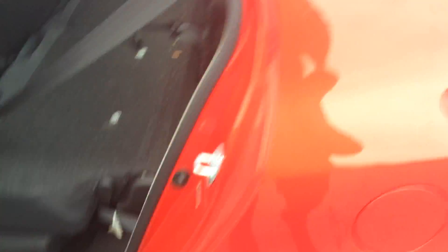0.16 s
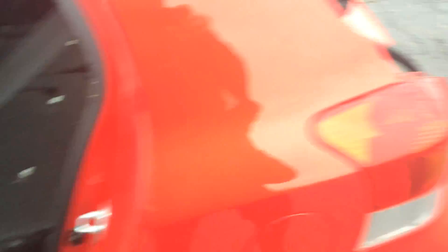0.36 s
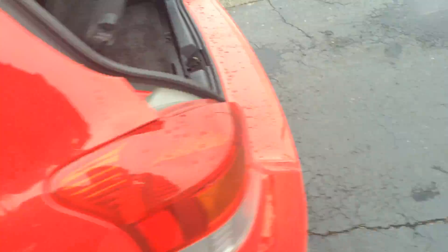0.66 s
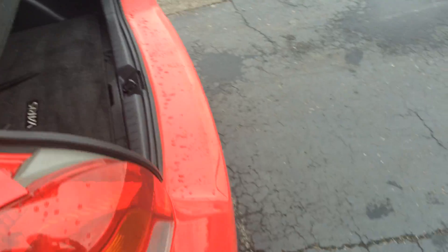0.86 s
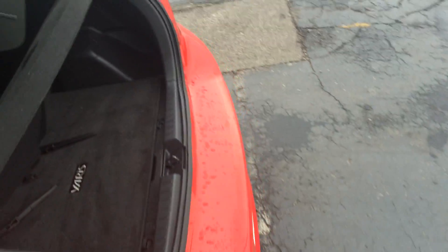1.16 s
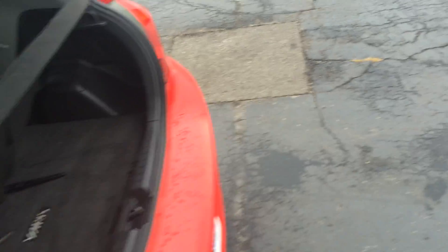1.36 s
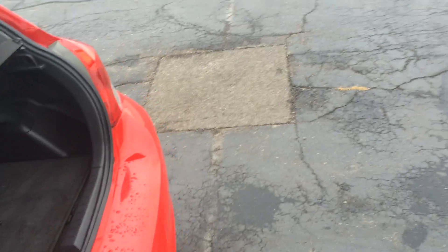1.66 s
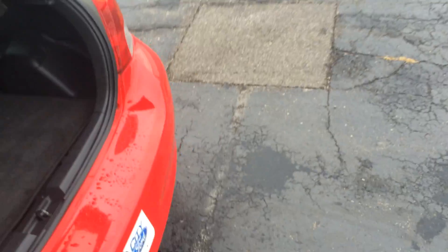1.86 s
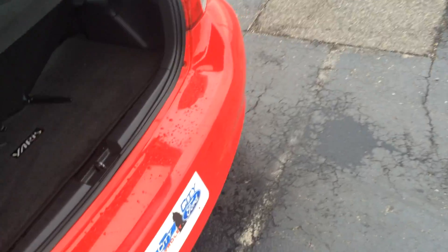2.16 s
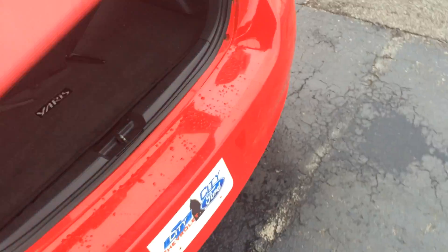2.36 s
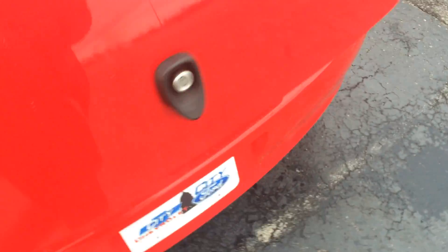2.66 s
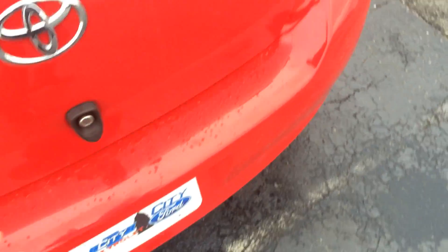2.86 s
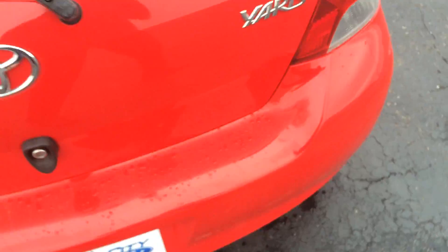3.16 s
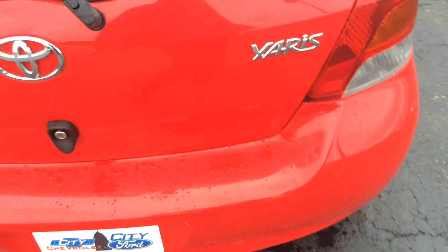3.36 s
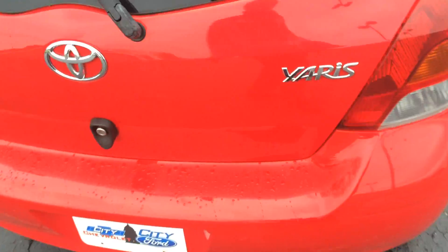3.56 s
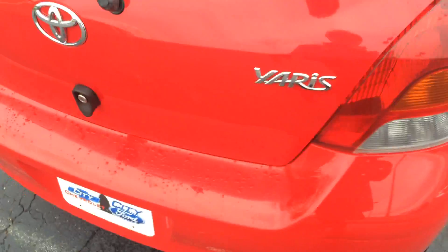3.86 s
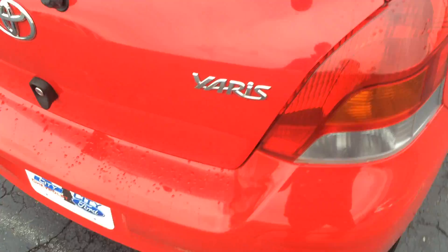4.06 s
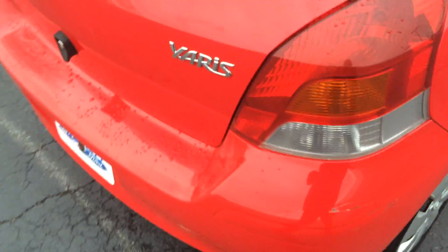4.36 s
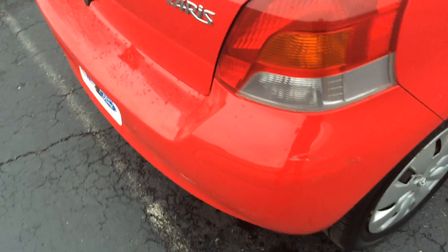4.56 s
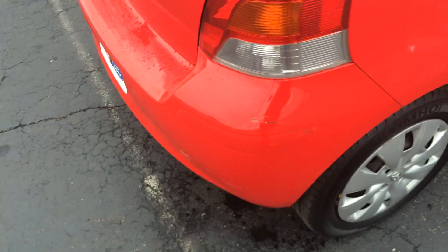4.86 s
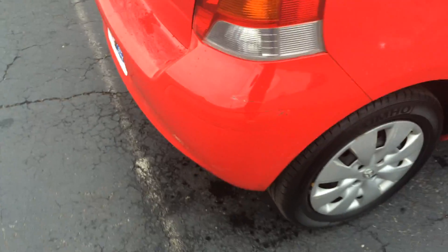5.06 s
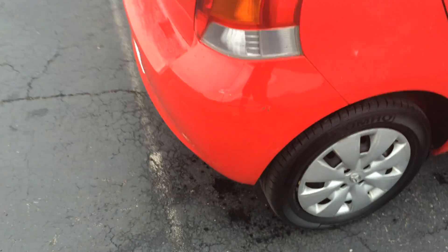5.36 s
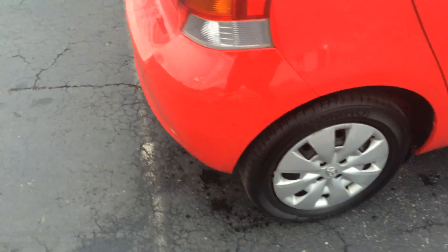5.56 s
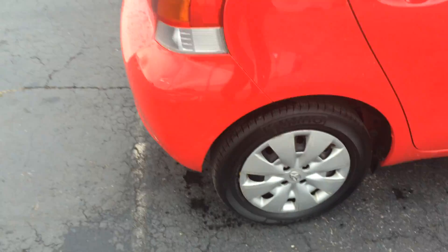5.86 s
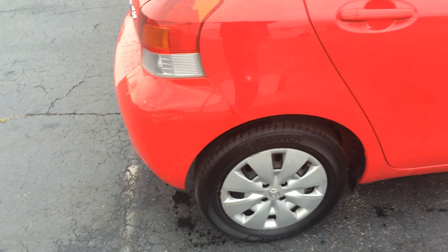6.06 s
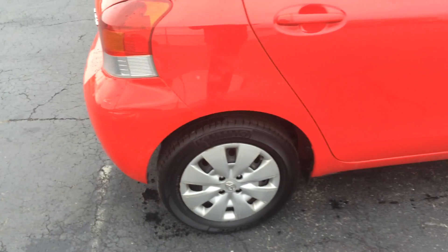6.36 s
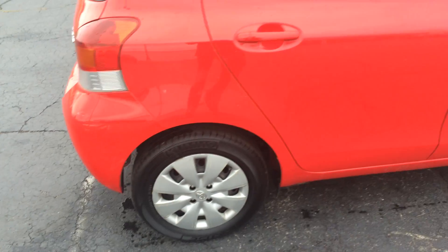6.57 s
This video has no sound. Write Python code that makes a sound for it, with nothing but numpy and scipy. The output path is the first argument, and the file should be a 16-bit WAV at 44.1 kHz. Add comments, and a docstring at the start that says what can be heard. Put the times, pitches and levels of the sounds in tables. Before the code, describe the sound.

A walk around a small hatchback in open air. Early wind buffeting leads straight into a door slam, tight and booming with a metallic latch. Quiet handling knocks, hollow panel rings and a couple of sharp clicks follow. The tailgate then drops shut with deep thumps and rattle. The background dips briefly after the loud peaks. Later, blustery bursts hit the microphone and a nearby engine ticks at idle as the car stops screening it.

```python
"""Two slams beside a small hatchback in a breezy car park: a rear door pushed shut, then the tailgate.
Each meets its rubber seal, the latch clacks, panels boom as decaying modes and trim rattles as noise bursts.
Wind eddies thump on the handheld microphone as smooth pressure swings over a rumbling breeze.
An idling engine ticks, clearer once the microphone rounds the car, over far traffic and open-air hiss.
The recorder's gain control ducks after loud peaks."""
import sys
import numpy as np
from scipy import signal
from scipy.fft import rfft, irfft
from scipy.io import wavfile
from scipy.ndimage import uniform_filter1d, minimum_filter1d

SR = 44100
rng = np.random.default_rng(int(sys.argv[2]) if len(sys.argv) > 2 else 0)


def int16_out(signal):
    """Quantize to a 16-bit WAV file."""
    q = np.round(np.clip(np.atleast_2d(signal).T, -1, 1) * 32767)
    wavfile.write(sys.argv[1], SR, q.astype(np.int16))


N = 296793
TIME = np.arange(N) / SR
RING = TIME[:SR // 2]  # half a second for each struck sound
LAG = RING - RING.mean()  # the same span, centred on zero


def undb(db):
    """Decibels to gain."""
    return 10 ** (np.asarray(db) / 20)


def curve(rows):
    """Levels of a (start_s, level_db) table, joined by straight lines in time."""
    rows = np.array(rows)
    return np.interp(TIME, rows[:, 0], rows[:, 1])


def add(out, s, sound):
    """Mix a sound in at time s, trimmed to the ends of the scene."""
    start = int(round(s * SR))
    sound, start = sound[max(-start, 0):], max(start, 0)
    out[start:start + len(sound)] += sound[:N - start]


def colour(x, points):
    """Filter by a (pitch_hz, level_db) spectrum, falling 20 dB per octave beyond its ends; rms 1."""
    hz, db = np.transpose(points)
    octave = np.log2(np.arange(len(x) // 2 + 1) * SR / len(x) + 1)
    known = np.log2(hz)
    beyond = np.abs(octave - np.clip(octave, known[0], known[-1]))
    gain = undb(np.interp(octave, known, db) - 20 * beyond)
    y = irfft(rfft(x) * gain, len(x))
    return y / np.std(y)


def noise(points, size=N):
    """Coloured noise of rms 1."""
    return colour(rng.standard_normal(size), points)


def walk(rate):
    """Slow chance: random levels held 1 / rate s and slewed; spread a little under 1."""
    hold = int(SR / rate)
    steps = np.repeat(rng.standard_normal(N // hold + 1), hold)
    return uniform_filter1d(steps, hold)[:N]


def fade(t60, attack_s):
    """Quick rise and exponential decay."""
    return (1 - np.exp(-RING / attack_s)) * np.exp(-np.log(1000) * RING / t60)


def ring(modes, attack_s, stretch=1):
    """Struck modes (pitch_hz, level_db, t60), each dying at its own rate."""
    total = 0
    for hz, db, t60 in modes:
        total = total + undb(db) * np.sin(2 * np.pi * hz * RING) * fade(t60 * stretch, attack_s)
    return total / np.sqrt(sum(undb(db) ** 2 for _, db, _ in modes))


def swing(hz, smoothness):
    """One swell and recoil of air pressure, centred on lag 0, of any polarity."""
    shape = (1 - 2j * np.pi * hz * LAG / (smoothness - .5)) ** -smoothness
    return np.real(shape * np.exp(2j * np.pi * rng.random()))


# gusts of the breeze: peak_s, spread_s (Gaussian), relative level_db
GUSTS = [(0.166, 0.16, -37.5), (0.566, 0.23, -29.5), (1.194, 0.19, -40.5), (1.672, 0.11, -42),
         (2.946, 0.23, -39.5), (3.73, 0.95, -40.5), (4.453, 0.055, -25.5), (4.764, 0.05, -32),
         (5.283, 0.094, -31), (5.677, 0.095, -37.5), (5.977, 0.26, -40), (6.473, 0.029, -32)]
CALM_DB = -49  # the breeze between gusts, on the same scale


def breeze_gain():
    """Strength of the breeze: gusts swell and die away over a steady calm, adding as powers."""
    power = undb(CALM_DB) ** 2
    for s, spread_s, db in GUSTS:
        gust = undb(db) * np.exp(-.5 * ((TIME - s) / spread_s) ** 2)
        power = power + gust ** 2
    return np.sqrt(power)


# strongest eddies on the microphone: centre_s, relative level_db, pitch_hz, relative core_level_db
EDDIES = [(.015, -25, 165, -36.5), (0.089, -19.5, 75, -58), (0.162, -16, 118, -44), (.371, -20, 151, -39),
          (.401, -11.5, 152, -34), (0.458, -20, 98, -52), (.477, -13.5, 119, -29.5),
          (0.492, -10.5, 113, -35), (0.526, -8.5, 99, -38), (.551, -22.5, 238, -29.5),
          (.582, -14, 154, -27), (.653, -8, 139, -35), (0.692, -19.5, 190, -29.5), (.756, -19, 160, -42),
          (1.115, -19.5, 124, -44), (1.424, -19.5, 117, -54), (2.309, -20.5, 78, -61),
          (4.421, -16.5, 110, -37), (4.443, -8, 107, -41), (4.473, -15, 160, -28), (4.499, -15.5, 220, -21),
          (4.591, -19.5, 199, -33), (4.628, -12.5, 106, -38.5), (4.687, -14.5, 153.7, -29.5),
          (4.738, -22.5, 130, -34), (4.767, -10.5, 160, -17.5), (4.785, -11.5, 133, -27),
          (4.795, -10, 98, -43.5), (4.807, -18, 340, -19.5), (4.829, -15.5, 149, -26.5),
          (4.845, -13, 150, -38), (4.884, -16.5, 115, -42), (5.142, -13.5, 138, -26.5),
          (5.171, -13.5, 110, -45), (5.19, -12, 124, -32), (5.216, -11, 121, -34),
          (5.292, -13.5, 125, -29.5), (5.309, -13, 134, -36), (5.343, -18, 146, -36),
          (5.406, -26.5, 202, -35.5), (5.567, -14.5, 88, -47), (5.586, -19.5, 190, -30),
          (5.677, -18.5, 143, -44), (5.71, -19.5, 90, -64), (5.905, -18.5, 124, -42),
          (6.012, -11.5, 84, -54), (6.08, -24.5, 131, -64), (6.177, -18.5, 119, -55),
          (6.406, -19.5, 196, -30), (6.478, -21, 257, -29.5), (6.49, -19, 154, -28.5)]
# colour of the breeze's rumble: pitch_hz, level_db
BREEZE_COLOUR = [(20, -21), (40, -1.5), (75, 5), (130, 1.5), (200, -7), (300, -16), (600, -32), (1500, -61)]


def wind(smoothness=5.46, eddy_db=-1.0, core_hz=340, core_rise=0.52, core_smoothness=8, core_db=0.5,
         swirl_db=-10, swirl_s=0.0085, wake_db=-18, wake_s=0.014, breeze_db=-1, calm_db=2, gusty_db=4):
    """Eddies are smooth pressure swings with sharp cores, in fine swirl and a wider, duller wake."""
    eddies, swirling, trailing = np.zeros(N), np.zeros(N), np.zeros(N)
    for s, db, hz, sharp_db in EDDIES:
        start_s = s + LAG[0]
        body = undb(db + eddy_db) * swing(hz, smoothness)
        # small eddies have higher cores
        core = undb(sharp_db + core_db) * swing(core_hz + core_rise * hz, core_smoothness)
        add(eddies, start_s, body + core)
        add(swirling, start_s, undb(sharp_db) ** 2 * np.exp(-(LAG / swirl_s) ** 2))
        add(trailing, start_s, undb(db) ** 2 * np.exp(-(LAG / wake_s) ** 2))
    swirl_colour = [(150, -27), (350, 4.5), (500, -3.0), (750, -23), (1500, -30.5)]
    wake_colour = [(30, -6.0), (70, 4.0), (130, 1.5), (250, -14.5), (600, -28.5), (1200, -74)]
    swirl = np.sqrt(swirling) * noise(swirl_colour)
    wake = np.sqrt(trailing) * noise(wake_colour)
    # the breeze is rough around the eddies and rumbles more evenly in the lulls
    unrest = np.sqrt(np.abs(uniform_filter1d(trailing, SR // 3)))
    gustiness_db = calm_db + (gusty_db - calm_db) * np.tanh(unrest / unrest.mean())
    breeze = noise(BREEZE_COLOUR) * breeze_gain() * undb(gustiness_db * walk(38))
    return eddies + undb(swirl_db) * swirl + undb(wake_db) * wake + undb(breeze_db) * breeze


# weak eddies: rate, level above the breeze strength, usual pitch
STRAY_PER_S, STRAY_DB, STRAY_HZ = 15, 8, 125
STRAY_SPREAD_DB, STRAY_OCTAVES = 2, 0.56  # scatter of level and of pitch


def stray_eddies(strength):
    """Weak eddies at random moments, following the breeze that carries them: s, level_db, pitch_hz."""
    moments = rng.random(size=300)[:int(STRAY_PER_S * N / SR)]
    scatter = np.clip(rng.standard_normal((300, 2)), -2, 2)
    rows = []
    for u, (loud, small) in zip(moments, scatter):
        breeze_db = 20 * np.log10(strength[int(u * N)])
        db = breeze_db + STRAY_DB + STRAY_SPREAD_DB * loud
        rows.append((u * N / SR, db, STRAY_HZ * 2 ** (STRAY_OCTAVES * small)))
    return rows


def flutter(smoothness=5):
    """The weak eddies patter softly on the microphone as small pressure swings."""
    out = np.zeros(N)
    for s, db, hz in stray_eddies(breeze_gain()):
        add(out, s + LAG[0], undb(db) * swing(hz, smoothness))
    return out


# colours of the far traffic and of the open-air hiss: pitch_hz, level_db
TRAFFIC = [(15, -47), (25, -14), (75, 0.5), (161, -12.5), (197, -2), (236, -22.5), (381, -18), (466, -23.5),
           (642, -24), (753, -20.5), (1060, -24), (1490, -30.5), (3000, -38), (3900, -84), (6600, -120)]
HISS = [(1500, 3), (2100, 2), (2500, -0.5), (3500, -1), (4600, -1.5), (6000, -5), (9000, -10.5),
        (15000, -16.5)]
# hiss by the door, behind the car and along its far side, one list each: start_s, relative level_db
HISS_LEVEL = [
    [(0.0, -61.5), (0.276, -62.5), (0.472, -56.5), (0.74, -61)],
    [(1.2, -60.5), (1.308, -59), (1.658, -64), (2.9, -60.5)],
    [(3.4, -58.5), (3.55, -58), (4.37, -59), (6.73, -60)],
]


def car_park(traffic_db=-45.0, hiss_db=1.5):
    """Nearly steady far traffic, and a smooth hiss that changes as the microphone goes round the car."""
    traffic = noise(TRAFFIC) * undb(traffic_db + 0.62 * walk(8.9))
    hiss = noise(HISS) * undb(curve(np.vstack(HISS_LEVEL)) + hiss_db)
    return traffic + hiss


# colour of the engine's ticking: pitch_hz, level_db
TICK = [(700, -14), (1400, 0), (1800, -8), (2450, -18), (2850, -8.5), (3150, -1), (3600, -3), (4100, -8.5),
        (7000, -16.5), (12000, -20)]
IDLE_HZ = 13.6  # turns of the crankshaft per second
# the car body screens the engine until the microphone rounds the corner
ENGINE_DB, SCREEN_DB, CORNER_S, CORNER_TAKES_S = -56.5, -10.5, 4.99, 0.063
ENGINE_RISE_DB_PER_S = 1.5  # the microphone then walks towards the engine


def engine(tick_decay=0.19, steady=0.72, uneven_db=1):
    """Metallic ticking noise swells on every crankshaft turn, louder once the car no longer screens it."""
    turn = np.cumsum(IDLE_HZ * (1 + 0.0065 * walk(2.28))) / SR % 1
    # rise and decay are fractions of a turn
    beat = steady + np.exp(-turn / tick_decay) * (1 - np.exp(-turn / 0.026))
    beat = beat / np.sqrt(np.mean(beat ** 2))
    past_corner_s = TIME - CORNER_S
    screened = .5 - .5 * np.tanh(past_corner_s / CORNER_TAKES_S)
    approach_db = ENGINE_RISE_DB_PER_S * np.maximum(past_corner_s, 0)
    level_db = ENGINE_DB + SCREEN_DB * screened + approach_db
    return noise(TICK) * beat * undb(level_db + uneven_db * walk(27))


# colour of loose trim: pitch_hz, level_db
RATTLE = [(300, -20), (700, 10.5), (2200, 2.5), (3200, -2), (5000, -6.5), (7000, -14.5), (11000, -18),
          (15000, -25)]


def slam(contacts, panel, steel, steel_db, clack_colour, clack_t60, tail_db, tail_t60, rattle_t60, push_s,
         ragged_db=0.5, ragged_per_s=260):
    """Each contact booms the panels, clacks the steel latch and shakes loose, unevenly chattering trim."""
    out, loose = np.zeros(N), np.zeros(N)
    boom, clang = ring(panel, push_s), ring(steel, 0.0006)
    # the shell around the latch rings on more softly, alike after every contact
    shell = undb(tail_db) * noise(clack_colour, size=len(RING)) * fade(tail_t60, 0.0064)
    for s, boom_db, clack_db, hard_hz, rattle_db in contacts:
        # the latch itself stops fast
        latch = noise(clack_colour, size=len(RING)) * fade(clack_t60, 0.00052)
        clack = latch + shell + undb(steel_db) * clang
        # contacts cushioned by rubber lose their treble
        cushion = signal.butter(2, hard_hz, fs=SR, output="sos")
        clack = signal.sosfilt(cushion, clack)
        add(out, s, undb(boom_db) * boom + undb(clack_db) * clack)
        rattle = noise(RATTLE, size=len(RING)) * fade(rattle_t60, 0.00027)
        add(loose, s, undb(rattle_db) * rattle)
    chatter = undb(ragged_db * np.clip(walk(ragged_per_s), -2, 2))
    return out + loose * chatter / np.sqrt(np.mean(chatter ** 2))


# contacts of the closing door, levels relative:
# start_s, boom_level_db, clack_level_db, hardness_hz (treble cutoff), rattle_level_db
DOOR = [(.771, -30, -27, 606, -75), (.785, -33, -16, 5000, -44), (.802, -16, -21, 6000, -26.5),
        (.805, -8, -13, 6000, -33.5), (.815, -41, -24, 6000, -42), (.825, -31, -17, 1500, -26),
        (.831, -3.5, -31, 600, -33), (.852, -11.5, -30, 1500, -41), (.918, -25, -39, 600, -53)]
# door panel and cabin modes, then steel around its latch: pitch_hz, relative level_db, t60_s
DOOR_MODES = [(79, -1, 0.13), (158.3, 0.5, 0.26), (168, -1, 0.29), (209, -1, 0.26), (281, 5.5, 0.085),
              (317, 4.5, 0.065), (346, -1, 0.059), (391.5, -8.5, 0.183), (469, -8, 0.13)]
DOOR_STEEL = [(682, 0, 0.15), (770, 11, 0.072), (819, 15, 0.086), (910, 3, 0.058), (1094, -7, 0.19),
              (1584, -5, 0.16), (1740, -5, 0.067), (1765, -2, 0.083), (1936, -6, 0.18), (1991, -3, 0.17),
              (3090, -11.5, .15)]
# colour of the door latch: pitch_hz, level_db
DOOR_CLACK = [(250, -15), (420, 9.5), (556, -15), (746, 1.5), (1170, -17), (1760, -8), (2170, -14),
              (3800, -25), (4890, -23), (5390, -50), (6120, -39), (12000, -42), (15600, -73), (22000, -120)]


def door():
    """The rear door closes over several contacts that excite its panels, latch and trim."""
    return undb(2.0) * slam(
        DOOR, DOOR_MODES, DOOR_STEEL, steel_db=-4.0, clack_colour=DOOR_CLACK, clack_t60=0.025,
        tail_db=-6.5, tail_t60=0.18, rattle_t60=0.13, push_s=0.001)


def pings(rows):
    """Single struck rings, each a decaying sine."""
    out = np.zeros(N)
    for s, db, hz, t60 in rows:
        add(out, s, undb(db) * ring([(hz, 0, t60)], 0.00065))
    return out


# short hard metallic rings in the slams and in the small clicks between them:
# start_s, level_db, pitch_hz, t60_s
METAL_RINGS = [(0.7886, -17, 1760, 0.034), (0.802, -10, 710, 0.027), (0.8045, -6.5, 1746, 0.024),
               (2.0151, -22, 1350, 0.011), (2.800, -36, 1640, 0.041), (3.0136, -6, 2080, 0.01),
               (3.0143, -10, 1180, .008), (3.0155, -5.5, 1620, 0.0097)]


def metal_rings():
    """Short hard metallic rings, each one quickly dying sine, in the slams and the small clicks between."""
    return pings(METAL_RINGS)


# air pumped by the seals and the flexing shell: centre_s, level_db (envelope peak), pitch_hz
THUMPS = [(0.83, 0, 170), (0.901, -13.5, 135), (3.0046, -4.5, 205), (3.019, -8, 85), (3.05, -10, 80),
          (3.068, -7.5, 110), (3.141, -17.5, 105)]


def cabin_air(smoothness=6):
    """Deep thumps as the closed cabin is squeezed and springs back."""
    out = np.zeros(N)
    for s, db, hz in THUMPS:
        add(out, s + LAG[0], undb(db) * swing(hz, smoothness))
    return out


# faint, thin squeaks: start_s, length_s, relative level_db, pitch_hz (before wavering)
SQUEAKS = [(1.214, 0.049, -60, 3265), (1.272, .046, -58.5, 3200), (4.34, 0.096, -59.5, 2590)]


def squeaks(waver=0.011, waver_per_s=130, broken_db=4):
    """Thin, broken tones that swell, waver in pitch and stop."""
    out, unsteady = np.zeros(N), 1 + waver * walk(waver_per_s)
    for s, length_s, db, hz in SQUEAKS:
        progress = np.clip((TIME - s) / length_s, 0, 1)
        swell = 2 * np.sqrt(progress * (1 - progress))
        out += undb(db) * swell * np.sin(2 * np.pi * np.cumsum(hz * unsteady) / SR)
    return out * undb(broken_db * walk(waver_per_s))


# light knocks and scuffs around the car: start_s, level_db, centre_hz, width_octaves, t60_s
KNOCKS = [(1.216, -36.5, 544, 0.55, 0.069), (1.219, -53, 4500, 3, 0.074), (1.285, -33, 297, 0.37, 0.038),
          (1.625, -41.5, 790, 0.54, 0.15), (1.646, -40.5, 485, 0.5, 0.14), (2.076, -35, 332, 0.12, 0.067),
          (2.425, -35, 270, 0.24, 0.23), (2.477, -34.5, 284, 0.28, 0.083), (2.777, -47.5, 1070, 0.64, 0.55),
          (3.248, -43.5, 1180, 0.53, 0.031), (4.517, -59, 7000, 1, 0.43), (6.219, -35.5, 586, 0.41, 0.043),
          (6.257, -44.5, 2310, 0.64, 0.036)]


def knocks():
    """Knocks on trim and bodywork: short noise bursts, each coloured by one spectral hump."""
    out, hz = np.zeros(N), np.geomspace(60, 16000, 25)
    for s, db, centre_hz, width, t60 in KNOCKS:
        hump_db = -20 * np.log10(1 + (np.log2(hz / centre_hz) / width) ** 2)
        burst = noise(np.c_[hz, hump_db], size=len(RING)) * fade(t60, 0.00057)
        add(out, s, undb(db) * burst)
    return out


# raised tailgate as it is gripped and pulled: start_s, level_db, pitch_hz, t60_s
HOLLOWS = [(1.628, -42.5, 790, 0.28), (1.632, -44, 502, 0.37), (2.803, -43, 927, 0.14),
           (2.814, -41.5, 707, 0.18)]


def hollows():
    """The hollow panel rings on, longer than the hard metallic rings."""
    return pings(HOLLOWS)


# sharp clicks of the tailgate's grip and struts: start_s, level_db, ring_level_db (against crack), t60_s
CLICKS = [(2.015, -34.5, -19, 0.047), (2.018, -50, 11, 0.027), (2.798, -42, 8.5, 0.082),
          (2.807, -37, -17, 0.049)]
# colour of the crack: pitch_hz, level_db
CLICK_COLOUR = [(400, -13), (1000, 2), (2200, 0), (3000, -8), (4200, -9), (7000, -11.5), (15000, -27)]
# ring of the clicks: pitch_hz, relative level_db, t60_ratio (multiple of the click's t60_s)
CLICK_MODES = [(965, 4, 1), (1240, -13, 1), (1776, 6.5, 1), (1940, -6, 1), (2370, 6, 1), (3930, -23, 1)]


def clicks():
    """Hard clicks: a crack of noise with a struck ring."""
    out = np.zeros(N)
    for s, db, ring_db, t60 in CLICKS:
        crack = noise(CLICK_COLOUR, size=len(RING)) * fade(t60, 0.00045)
        add(out, s, undb(db) * (crack + undb(ring_db) * ring(CLICK_MODES, 0.00025, t60)))
    return out


# contacts of the tailgate, levels relative:
# start_s, boom_level_db, clack_level_db, hardness_hz (treble cutoff), rattle_level_db
TAILGATE = [(2.9975, -9.5, -11.5, 990, -35), (3.002, -13, -14, 900, -37), (3.014, -14.5, -8.5, 7100, -20),
            (3.009, -40, -30, 9000, -42), (3.036, -11.5, -27, 2013, -25.5), (3.044, -11, -19, 1230, -27),
            (3.051, -25, -17.5, 1500, -29.5), (3.062, -24, -13.5, 1000, -55), (3.072, -28, -36, 1500, -42),
            (3.086, -13.5, -30, 800, -60), (3.098, -29, -21, 900, -42)]
# tailgate panel and cabin modes, then steel around its latch: pitch_hz, relative level_db, t60_s
TAILGATE_MODES = [(63, 0, 0.26), (100.4, -11, 0.19), (124, -9, 0.22), (151, 0, 0.21), (206.5, 2.5, 0.21),
                  (232.6, -9, 0.2), (262.5, -8.5, 0.18), (305, -10.5, 0.27), (363, -12.5, 0.25),
                  (483, -8, 0.12)]
TAILGATE_STEEL = [(547, 8, 0.13), (708, 5, 0.2), (795, 5, 0.13), (860, 9, 0.045), (1173, -2, 0.27),
                  (1270, -23, .14), (1830, -20, 0.17), (1800, -7, 0.17), (2110, 1, 0.15), (2310, -2, 0.18),
                  (3910, -12, 0.22)]
# colour of the tailgate latch: pitch_hz, level_db
TAILGATE_CLACK = [(150, -16), (230, 5), (413, -26), (527, -6), (1040, -20.5), (1150, -14.5), (1890, -15),
                  (2090, -18), (2620, -41), (3800, -32), (5880, -46), (6380, -38), (12000, -30),
                  (15600, -75), (22000, -120)]


def tailgate():
    """The tailgate slams over several contacts that excite its panels, latch and trim."""
    return undb(3.0) * slam(
        TAILGATE, TAILGATE_MODES, TAILGATE_STEEL, steel_db=-10.0, clack_colour=TAILGATE_CLACK,
        clack_t60=0.028, tail_db=-17.5, tail_t60=0.28, rattle_t60=0.094, push_s=0.0013)


def scene():
    """Door, tailgate and small knocks in the open air, at one microphone."""
    air = wind() + flutter() + car_park() + engine()
    slams = door() + cabin_air() + tailgate()
    small_sounds = metal_rings() + squeaks() + knocks() + hollows() + clicks()
    return (air + slams + small_sounds)[None]


def record(dry, low_cut_hz=42, threshold=0.33, depth_db=-5, hold_s=0.26, slew_s=0.032, ceiling=0.84,
           top_hz=15400):
    """The microphone sheds deep bass; gain ducks after loud peaks, peaks are rounded, the top is cut."""
    low_cut = signal.butter(1, low_cut_hz, "high", fs=SR, output="sos")
    picked_up = signal.sosfilt(low_cut, dry)
    wanted = np.clip(threshold / (np.abs(picked_up[0]) + 1e-9), undb(depth_db), 1)
    hold, slew = int(hold_s * SR) | 1, int(slew_s * SR) | 1
    # both windows look back, so the gain falls after the peak, holds and lets go
    held = minimum_filter1d(wanted, hold, origin=hold // 2)
    gain = uniform_filter1d(held, slew, origin=slew // 2)
    rounded = ceiling * np.tanh(picked_up * gain / ceiling)
    top_cut = signal.ellip(10, .2, 70, top_hz, fs=SR, output="sos")
    return signal.sosfilt(top_cut, rounded)


dry = scene()
out = record(dry)
int16_out(out)
```